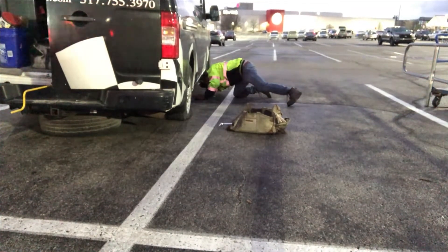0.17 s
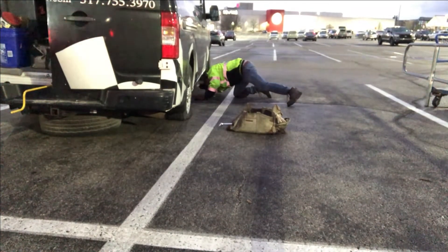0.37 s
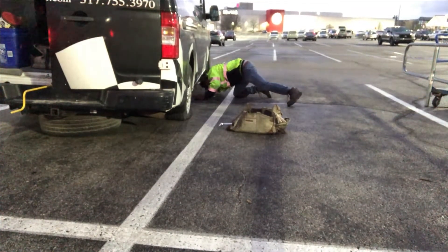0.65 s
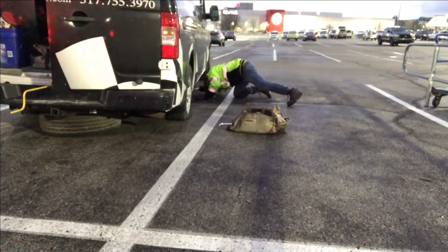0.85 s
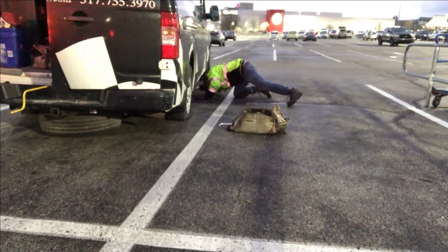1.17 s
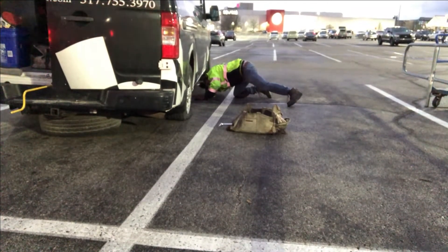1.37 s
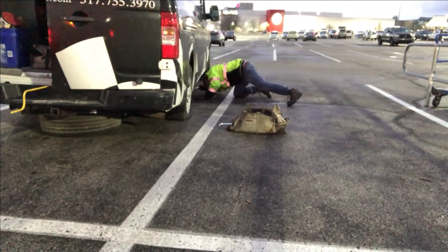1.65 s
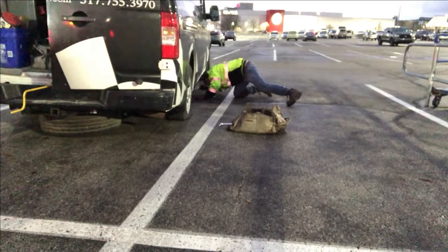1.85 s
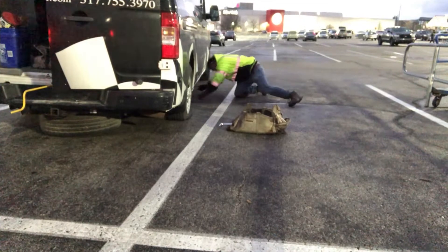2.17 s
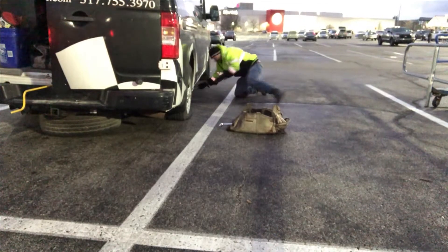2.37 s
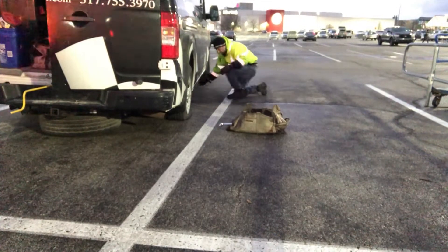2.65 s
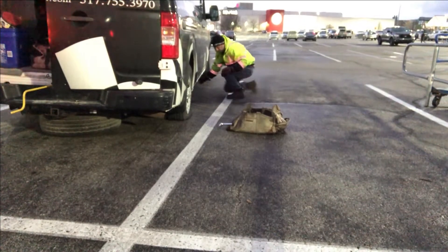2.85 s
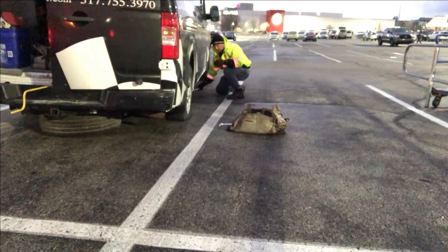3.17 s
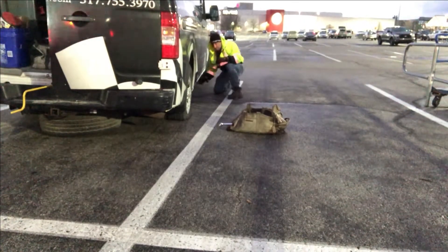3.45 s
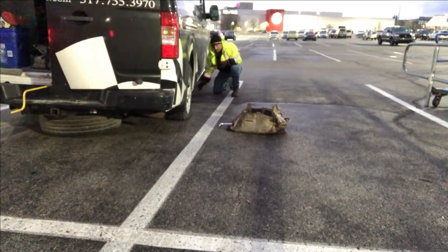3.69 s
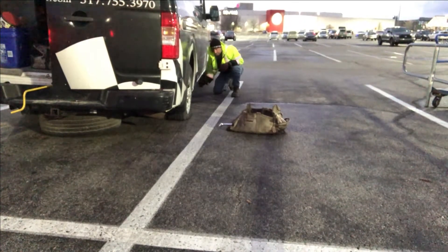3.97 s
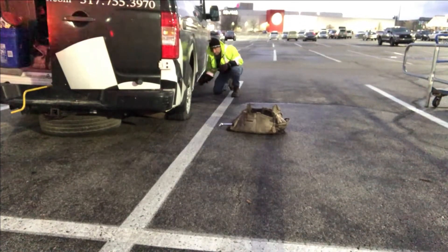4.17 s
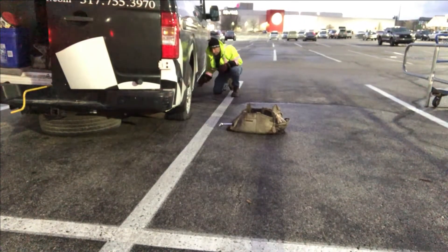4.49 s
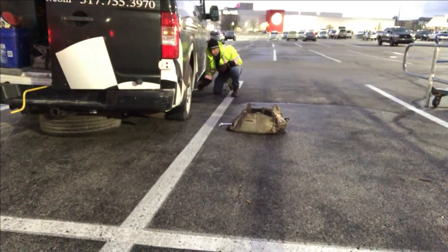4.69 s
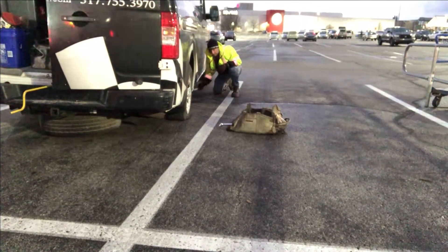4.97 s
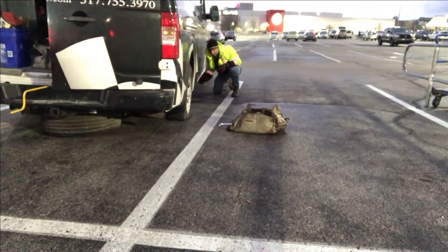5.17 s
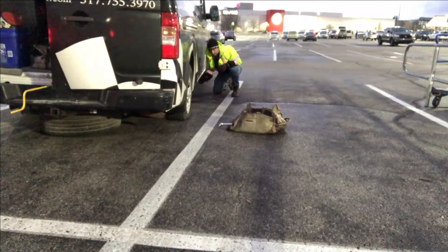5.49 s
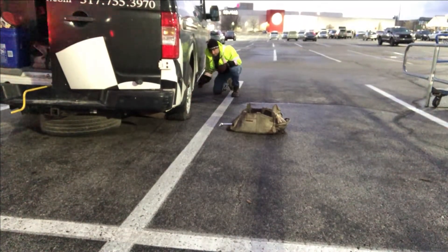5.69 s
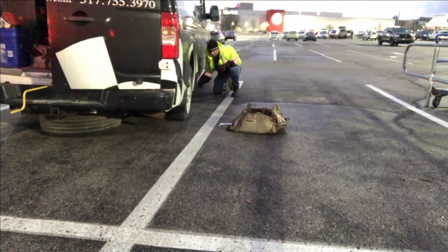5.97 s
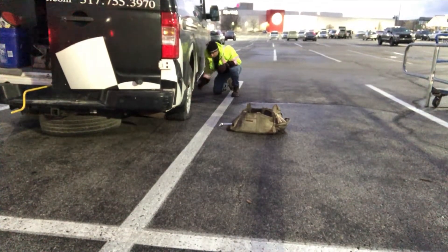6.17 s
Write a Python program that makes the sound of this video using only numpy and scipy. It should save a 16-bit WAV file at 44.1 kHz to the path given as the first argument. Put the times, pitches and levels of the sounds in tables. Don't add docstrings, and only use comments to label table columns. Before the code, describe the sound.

Outdoors in a car park, a floor jack is pumped in quick rattling strokes with metallic clinks and drops, plus one early hard knock. Boots and knees bump and scrape as the worker shifts, a stiff jacket rustling. Then heavy blows boom the van panels and ring the handle. Distant traffic hums. A close wireless microphone, left channel only, clips on knocks and stutters with tiny dropouts.

```python
import sys
import numpy as np
from scipy import signal
from scipy.fft import rfft, irfft, next_fast_len
from scipy.io import wavfile
from scipy.ndimage import map_coordinates

SR = 44100
rng = np.random.default_rng(int(sys.argv[2]) if len(sys.argv) > 2 else 0)


def inscribe(sig):
    pcm = np.round(np.clip(np.atleast_2d(sig).T, -1, 1) * 32767)
    wavfile.write(sys.argv[1], SR, pcm.astype(np.int16))


def ratio(d):
    e = np.asarray(d, float) / 20
    return 10 ** e


N = 279153

# start_s, crack_db, boom_db, ring_db, length_factor
KNOCKS = [
    (0.2572, -18.5, -13, -41.5, 1.1),
    (2.7786, -25, -20, -35, 1.27),
    (2.812, -31, -26, -61, 1.86),
    (3.4354, -44, -19.5, -73, 1.32),
    (4.2407, -19, -13, -32, 1.59),
    (4.8682, -13, -10.5, -32.5, 1.17),
    (5.181, -17.5, -10.5, -36, 1.1),
    (5.4924, -19, -11, -40, 1.13),
    (5.8003, -24.5, -16.5, -35.5, 1.38),
    (6.1, -29.5, -19.5, -53, 1.29),
]
# start_s, peak_db
DROPS = [
    (0.1378, -21.5),
    (0.5606, -19.5),
    (0.9552, -24.5),
    (1.3357, -23.5),
    (1.6826, -25),
]


def unit(x):
    return x / np.sqrt(np.mean(x ** 2) + 1e-20)


def along(points, hz):
    f, v = np.transpose(points)
    return np.interp(np.log(hz + 1), np.log(f + 1), v)


def curve(rows):
    return np.interp(np.arange(N) / SR, *np.transpose(rows))


def wobble(rate_hz):
    knots = rng.standard_normal(int(N * rate_hz / SR) + 4)
    return map_coordinates(knots, [np.arange(N) * rate_hz / SR])


def filtered(x, response):
    m = next_fast_len(N + SR // 2)
    return irfft(rfft(x, m) * response(np.fft.rfftfreq(m, 1 / SR)), m)[:N]


def hiss(spectrum):
    return unit(filtered(rng.standard_normal(N), lambda hz: ratio(along(spectrum, hz))))


def low_pass(hz, edge_hz):
    return 1 / (1 + (hz / edge_hz) ** 4)


def decay(t, t60_s):
    return ratio(-60 * t / t60_s)


def rise(t, rise_s):
    return 1 - np.exp(-t / rise_s)


def modes(t, rows):
    return sum(ratio(db) * decay(t, t60_s) * np.sin(2 * np.pi * hz * t) for hz, db, t60_s in rows)


def add(track, s, piece):
    part = track[round(s * SR):][:len(piece)]
    part += piece[:len(part)]


def lot():
    # pitch_hz, level_db_per_hz
    rumble_spectrum = [(8.8, -40.5), (15, 7.5), (81, -4), (120, -5.5), (151, -8.5), (214, -17),
                       (300, -23.5), (390, -69), (660, -120)]
    # pitch_hz, level_db_per_hz
    wash_spectrum = [(130, -21), (220, -9), (400, -11), (800, -16.5), (2070, -31.5), (5000, -48),
                     (11000, -59), (14500, -74), (16500, -110)]
    # time_s, strength_db
    breeze = [(0, -48), (0.35, -43), (0.8, -48), (1.45, -43.5), (1.9, -45.5), (2.4, -40), (3.2, -42),
              (3.6, -45.5), (4.2, -41), (4.7, -48), (5.1, -44.5), (5.8, -44), (6.33, -43)]
    # time_s, effort_db
    effort = [(0, 4.5), (0.3, -7), (0.62, -7.5), (0.88, 1), (1.1, -9), (1.7, -6.5), (2.0, 8), (2.2, -4),
              (2.45, 1.5), (2.9, 3.5), (3.3, -5), (3.5, 4.5), (3.85, -9), (4.1, -2), (4.4, -11),
              (5.0, -0.5), (5.35, -6), (6.33, -9.5)]
    traffic_db, grit_db, grit_growth = -56.5, -48.5, 1.2
    gusts_db = 1.5 * wobble(9)
    rumble = ratio(curve(breeze) + 8 + gusts_db) * hiss(rumble_spectrum)
    wash_level = ratio(traffic_db) + ratio(grit_db + grit_growth * curve(effort))
    return rumble + wash_level * ratio(1.0 * wobble(18)) * hiss(wash_spectrum)


def jacket():
    # time_s, level_db
    rustle = [(0, -70), (0.25, -98), (0.75, -67.5), (1.05, -98), (1.75, -72), (2.4, -79), (2.82, -59),
              (3.4, -74), (3.68, -63), (4.05, -70), (4.4, -87), (5.05, -64), (5.35, -78.5), (5.62, -72),
              (6.33, -89)]
    weave = hiss([(2000, -28), (3800, -2), (4700, -4.5), (6200, -14.5), (9000, -23), (12000, -48), (14000, -70)])
    creases_db = 3.8 * wobble(30) + 2.7 * wobble(300)
    return ratio(curve(rustle) + 1.0 + creases_db) * weave


def small_contacts():
    # start_s, peak_db, pitch_hz
    clink_rows = [(0.067, -20.5, 1725), (0.1465, -20, 1630), (0.455, -42, 1246), (0.5015, -22.5, 1704),
                  (0.5626, -29, 1900), (0.8535, -28.5, 1246), (0.8778, -20, 1990), (0.9578, -30, 1097),
                  (1.269, -34, 1740), (1.3353, -29, 1266), (1.6055, -26.5, 1806), (1.6846, -30, 1980),
                  (1.9244, -16.5, 2115), (2.0134, -30, 1237), (2.1722, -32, 1956), (2.4016, -28, 3190),
                  (2.4483, -36, 2070), (2.5244, -41, 1600), (2.737, -42, 2760), (3.1268, -24, 1717),
                  (3.2504, -28.5, 3030), (3.5639, -30, 1810), (3.5796, -28, 1965), (3.693, -27.5, 2770),
                  (3.7773, -33.5, 1115), (4.0846, -39, 1970), (4.132, -35, 2830), (4.288, -38, 1350),
                  (4.6668, -38, 1087)]
    # start_s, peak_db, pitch_hz, t60_s
    pings = [(0.455, -48, 4330, 0.15), (0.562, -47, 6400, .15), (1.66, -51, 5830, .3),
             (4.294, -40, 2720, .1), (4.36, -44, 2890, .15), (4.36, -46, 2000, .15),
             (2.806, -38, 1960, .15), (2.806, -42, 3150, .15), (3.27, -38, 2100, .08),
             (3.362, -42, 2000, .05), (3.374, -42, 2300, .05), (3.637, -38, 2750, .06),
             (3.615, -36, 1850, .06), (2.399, -28.5, 3890, 0.079), (2.527, -47, 4400, 0.14),
             (3.777, -42, 4350, 0.1)]
    # start_s, peak_db, pitch_hz, t60_s
    bumps = [(2.337, -30, 555, .05), (2.372, -26, 590, 0.044), (2.33, -24, 48, 0.12),
             (2.408, -20, 590, 0.03), (2.422, -22, 480, 0.03), (2.447, -37, 590, .05),
             (2.498, -29, 490, 0.08), (2.578, -21.5, 547, 0.076), (2.590, -17.5, 397, 0.12),
             (2.598, -24, 706, 0.065), (2.612, -22.5, 490, 0.1), (2.743, -28.5, 630, 0.1),
             (3.548, -18, 295, 0.11), (3.569, -25, 269, 0.033), (3.12, -31.5, 305, 0.14)]
    # start_s, peak_db, pitch_hz
    grit = [(2.338, -40, 1200), (2.357, -36, 1100), (2.358, -44, 2900), (2.371, -38, 1000),
            (2.386, -40, 1500), (2.4095, -22, 560), (2.4225, -25, 500), (2.447, -34, 2050),
            (2.474, -38, 900), (2.498, -38, 3100), (2.530, -38, 2400), (2.580, -37, 2500),
            (2.588, -36, 3100), (2.592, -24, 640), (2.605, -30, 800), (2.618, -30, 420), (2.666, -40, 2400),
            (2.730, -37, 2100), (2.742, -36, 2750), (2.752, -33, 800)]
    # start_s, peak_db, pitch_hz
    more_grit = [(1.870, -36, 1050), (1.882, -38, 950), (2.512, -46, 4500), (2.545, -44, 4300),
                 (2.556, -45, 3700), (3.1098, -34, 1940), (3.1278, -25, 1740), (3.140, -28, 2050),
                 (3.158, -30, 3000), (3.249, -32, 2500), (3.2745, -38, 3100), (3.3618, -42, 2190),
                 (3.5349, -40, 985), (3.5538, -32, 2840), (3.5623, -27, 1780), (3.6805, -40, 1960),
                 (3.6935, -32, 2760), (3.7324, -41, 1170), (3.7783, -34, 1100)]
    # start_s, peak_db, pitch_hz
    ticks = [(0.399, -30, 1500), (0.445, -55, 9500), (0.7465, -43.5, 6450), (1.2045, -52, 6160),
             (2.066, -15.5, 1220), (2.357, -48.5, 2350), (2.277, -45, 2190), (2.971, -26, 800),
             (2.6585, -33, 800), (4.3483, -28, 800), (5.0478, -39, 5060), (5.2536, -29.5, 5060),
             (5.7935, -24.5, 4600), (0.806, -42, 1400), (1.188, -44, 1500), (1.9195, -24, 2100),
             (4.031, -38, 1500), (6.178, -40, 1600)]
    out, t = np.zeros(N), np.arange(SR // 4) / SR

    clink_t60_s = 0.1
    clinks = [(*row, clink_t60_s) for row in clink_rows]
    piston_db, piston_hz, piston_t60_s = -2.5, 618, 0.1
    piston = [(s + .002, db + piston_db, piston_hz, piston_t60_s) for s, db in DROPS]
    for rows, rise_s, wander_rad in [(clinks + pings, .004, 1.2), (bumps + piston, .003, .8)]:
        for s, db, hz, t60_s in rows:
            drift = wander_rad * np.interp(t, np.linspace(0, t[-1], num=40), rng.standard_normal(size=40))
            tone = np.sin(2 * np.pi * hz * t + drift)
            add(out, s, ratio(db - 1.0) * decay(t, t60_s) * rise(t, rise_s) * tone)

    grit_db, grit_cycles = -3, 14
    for s, db, hz in grit + more_grit:
        add(out, s, modes(t, [(hz, db + grit_db, grit_cycles / hz)]))

    touch_db, touch_hz = 1.5, 680
    touches = [(row[0], row[1] + touch_db, touch_hz) for row in KNOCKS]
    for s, db, hz in ticks + touches:
        attack = np.clip(1.9 * hz * t, 0, 1)
        add(out, s, -attack * modes(t, [(hz, db + 11.5, 3.7 / hz)]))
    return out


def bursts():
    # start_s, peak_db, low_share_db, t60_s
    jolts = [(2.158, -40, -1.5, 0.2), (2.171, -38, -3, 0.15), (2.3993, -27, 2.5, 0.18),
             (2.576, -36, 9, 0.25), (2.709, -39, -2, 0.2), (2.7192, -32, -2, 0.11), (2.806, -33, -7, 0.25),
             (3.1248, -21, -23, 0.18), (3.2464, -30.5, -10, 0.14), (3.36, -45.5, -6, 0.17),
             (3.548, -33, -4, 0.17), (3.5606, -29, -4, 0.17), (3.68, -33, -15, 0.25),
             (3.7758, -33, -2.5, 0.14), (4.082, -32, -9, 0.089), (4.1305, -38, -2, 0.081),
             (4.294, -41, 0.5, 0.1), (4.356, -42, 1.5, 0.2), (4.664, -41, 1.5, 0.17),
             (5.293, -38.5, -3, 0.058), (5.895, -36, 1, 0.086), (6.1765, -32, 4.5, 0.1)]
    # start_s, peak_db, high_share_db
    drags = [(0.012, -39, -27), (1.219, -36, -31), (1.5474, -36.5, -42), (1.8676, -40, -38),
             (2.4483, -40, -17), (2.6444, -42.5, -14.5), (3.076, -40.5, -41), (3.528, -33, -21),
             (3.585, -34, -19), (4.029, -35, -27)]
    # start_s, peak_db
    slacks = [(0.0308, -26.5), (0.444, -31.5), (0.841, -30), (1.231, -30.5), (1.5824, -30), (1.8946, -30)]
    # start_s, peak_db
    pulls = [(0.053, -25.5), (0.4873, -26.5), (0.876, -26), (1.255, -27.5), (1.6024, -21), (1.9185, -21)]
    # start_s, peak_db
    stops = [
        (1.186, -41),
        (2.0108, -22),
    ]
    # start_s, peak_db
    thuds = [(0.3955, -39), (0.805, -47), (2.354, -43), (3.7334, -46.5), (4.2044, -61), (5.5867, -41.5)]
    # start_s, peak_db
    swishes = [(2.2744, -71), (2.495, -50), (2.527, -50), (2.587, -50), (3.2745, -64), (4.2044, -59),
               (4.5344, -60), (4.953, -55), (6.0314, -58), (6.06, -58)]
    jolt_high_db, jolt_rise_s = -21, 0.003
    drag_low_db, drag_rise_s, drag_t60_s = 0, .016, 0.37
    rows = [(s, db, low_db, jolt_high_db, jolt_rise_s, t60_s) for s, db, low_db, t60_s in jolts]
    rows += [(s, db, drag_low_db, high_db, drag_rise_s, drag_t60_s) for s, db, high_db in drags]
    # (low_share_db, high_share_db, rise_s, t60_s)
    kinds = [(slacks, (-6.5, -27.5, .007, 0.3364)),
             (pulls, (-4, -20, .003, .24)),
             (DROPS, (-4, -17.5, .002, 0.145)),
             (stops, (-15, -27, .005, .13)),
             (thuds, (10, -42.5, .005, .12)),
             (swishes, (-4, -7.5, .004, .13))]
    return rows + [(s, db, *kind) for events, kind in kinds for s, db in events]


def strokes():
    # pitch_hz, level_db_per_hz
    rasp = [(150, -22.5), (250, 0), (430, -12), (600, -4), (866, -4), (1600, -7.5), (2800, -8.5),
            (7000, -26.5), (11400, -34.5), (15500, -46), (17000, -86)]
    # pitch_hz, width_hz, boost_db
    frame = [(608, 40, 9), (1230, 30, 8), (1720, 30, 11), (1990, 35, 9), (2110, 25, 7), (2780, 35, 9),
             (3100, 35, 10), (3850, 50, 6), (4400, 60, 8), (5130, 50, 5), (5810, 45, 10), (6420, 45, 9),
             (7800, 70, 7)]
    low, mid, high, top = np.zeros((4, N))
    t = np.arange(SR // 2) / SR
    echo = ratio(-32.5) * decay(t, 0.55)
    for s, db, low_db, high_db, rise_s, t60_s in bursts():
        swell = rise(t, np.clip(rise_s, .0005, .05))
        add(low, s, ratio(db + low_db - 2.5) * decay(t, t60_s * 1.03) * swell)
        add(mid, s, ratio(db - 4.5) * (decay(t, t60_s) + echo) * swell)
        add(high, s, ratio(db + high_db + 8.5) * (decay(t, t60_s * 0.91) + echo) * swell)
        add(top, s, ratio(db + 1.77 * high_db + 15) * decay(t, t60_s * 0.77) * swell)

    def frame_gain(hz):
        return 1 + sum((ratio(db) - 1) / (1 + ((hz - c) / width) ** 2) for c, width, db in frame)

    def band(hz, from_hz, to_hz):
        colour = ratio(along(rasp, hz)) * frame_gain(hz)
        return colour * low_pass(hz, to_hz) * (1 - low_pass(hz, from_hz))

    out = np.zeros(N)
    edges_hz = [(30, 1000), (950, 3680), (3700, 4960), (7500, 9300)]
    for level, (from_hz, to_hz) in zip([low, mid, high, top], edges_hz):
        chatter = rng.standard_normal(N) * ratio(3 * wobble(600) + .7 * wobble(90))
        out += level * unit(filtered(chatter, lambda hz: band(hz, from_hz, to_hz)))
    return out


def knocks():
    # pitch_hz, level_db, t60_s
    body = [(124.5, -15, 0.19), (162.7, 3, 0.091), (209, -8, 0.066), (238, -12, 0.08), (286, -7, 0.08),
            (306.6, -5.5, 0.063), (336.6, -10.5, 0.1), (412.7, -10.5, 0.086), (650.5, -19.5, 0.063),
            (845, -27.5, 0.17), (942, -28, 0.15), (1090, -30.5, 0.084), (1530, -37, 0.079)]
    # pitch_hz, level_db, t60_s
    bar = [(4840, -6, 0.24), (5130, -8, 0.15), (5400, -8, 0.2), (5730, -20, .15), (6290, -6, 0.09)]
    grips = [(-6, -9, 6, 2), (-3, -4, -10, -20), (0, 0, 0, -10), (0, 0, 0, -10), (2, -14, -5, 1),
             (0, -12, -5, 0), (0, -14, -5, 2), (0, -12, -5, 0), (0, -14, -5, -2), (0, -12, -5, -2)]
    # pitch_hz, level_db, t60_s
    saddle = [(1254, -6, .13), (1320, -8, .15), (1415, -2, .08), (1580, -2, .08), (1850, -14, .15),
              (2085, -14, .16), (2550, -17, .15), (2730, -17, .15), (2893, -17, .18), (3040, -15, .12),
              (3160, -19, .17), (3450, -24, .2), (3780, -26, .15), (4120, -26, .12)]
    # pitch_hz, level_db_per_hz
    crack_spectrum = [(120, -45), (200, 3), (647, -13), (933, -14), (3130, -34), (4270, -47.5),
                      (4950, -38.5), (5420, -43.5), (16000, -72)]
    saddle_db = -10
    soft_loss, soft_hz = .35, 600
    out, dull, sharp, snap = np.zeros((4, N))
    t = np.arange(SR // 2) / SR
    spread = rise(t, 0.0018)
    landing = 1 / (1 + (t / .095) ** 14)
    for (s, crack_db, boom_db, ring_db, length), grip in zip(KNOCKS, grips):
        detune = rng.normal(1, .001)
        soft_db = soft_loss * min(crack_db - boom_db + 9, 0)
        boom = modes(t, [(hz, db + soft_db * (hz > soft_hz) + rng.normal(0, 1.6) * (db < 0), t60_s * length)
                         for hz, db, t60_s in body])
        ring = modes(t, [(hz * detune, db + change_db, t60_s)
                         for (hz, db, t60_s), change_db in zip(bar, (0, *grip))])
        arm = modes(t, [(hz * rng.normal(1, .004), db + rng.normal(0, 3), t60_s * length)
                        for hz, db, t60_s in saddle])
        add(out, s, ratio(crack_db + saddle_db) * arm)
        add(out, s, -ratio(boom_db + 11) * spread * boom)
        add(out, s, ratio(ring_db) * rise(t, 0.0028) * landing * ring)

        dull_tail = decay(t, 0.19 * length) + ratio(-17) * decay(t, 0.43)
        add(dull, s, ratio(boom_db - 5 + soft_db / 2) * spread * dull_tail)
        sharp_tail = decay(t, 0.055 * length) + ratio(-16) * decay(t, 0.26)
        add(sharp, s, ratio(crack_db + 1.1) * rise(t, 0.00024) * sharp_tail)
        add(snap, s, ratio(1.5 * crack_db + 3.5) * decay(t, 0.027))

    crack = hiss(crack_spectrum)
    below = unit(filtered(crack, lambda hz: low_pass(hz, 830)))
    above = unit(filtered(crack, lambda hz: low_pass(hz, 6700) * (1 - low_pass(hz, 570))))
    steel = hiss([(400, -15.0), (1200, -0.5), (4500, -9.5), (9000, -21.5), (16000, -38.0)])
    return out + dull * below + sharp * above + snap * steel


def scene():
    heard = lot() + jacket() + small_contacts() + strokes() + knocks()
    return np.array([heard, np.zeros(N)])


def gaps():
    # start_s, lost_packets
    long_gaps = [(2.1911, 3), (2.5662, 3), (2.959, 4), (2.9815, 11), (3.0541, 4), (3.0839, 5), (3.1015, 3),
                 (3.2591, 4), (3.4003, 6), (3.4209, 5), (3.744, 4), (3.8641, 4), (3.9092, 6), (4.0013, 3),
                 (4.2311, 3), (4.9337, 6), (4.9791, 4), (5.0012, 3), (5.284, 4), (5.3664, 5), (5.6029, 4.5),
                 (5.6962, 5), (5.7441, 4), (6.1836, 4)]
    short_gaps = [2.1217, 2.2863, 2.6288, 2.9715, 3.0239, 3.1181, 3.1639, 3.304, 3.3538, 3.5113, 3.6739,
                  3.769, 3.9589, 4.0239, 4.0764, 4.4015, 4.4638, 4.5588, 4.8888, 4.9631, 5.1638, 5.3038,
                  5.3537, 5.7237, 5.7637, 5.9287, 6.0239, 6.1637]
    # start_s, gap_count, spacing_packets
    stutters = [(2.4764, 2, 4), (2.659, 2, 10), (2.9213, 2, 5), (3.7139, 2, 4), (4.3288, 2, 8),
                (4.639, 3, 4), (4.7214, 2, 9), (4.7938, 2, 10), (5.0232, 2, 10), (5.0688, 2, 10),
                (5.114, 2, 4), (5.1391, 2, 4), (5.2137, 4, 8), (5.4089, 2, 6), (5.4441, 2, 8),
                (5.5138, 2, 8), (5.5584, 2, 8), (5.6489, 2, 4), (5.7938, 2, 8), (5.8588, 2, 10)]
    packet_ms, resync_ms = 2.5, 1.75
    repeats = [s + k * apart * packet_ms / 1000 for s, count, apart in stutters for k in range(count)]
    losses = long_gaps + [(s, 2) for s in short_gaps + repeats]
    return [(s, packets * packet_ms + resync_ms) for s, packets in losses]


def band_limit(x):
    return signal.sosfilt(signal.butter(12, 16590, fs=SR, output="sos"), x)


def record(dry):
    limit = np.where(dry[0] > 0, .97, .72)
    clipped = dry[0] / (1 + np.abs(dry[0] / limit) ** 12) ** (1 / 12)
    link, ramp = np.ones(N), np.linspace(0, 1, num=26) ** 2.5
    for s, ms in gaps():
        a, b = round(s * SR), round((s + ms / 1000 + .0003) * SR)
        link[a:b] = .8 * np.exp(-np.arange(b - a) / SR / .00022)
        link[b - len(ramp):b] = ramp
    left = filtered(clipped * link, lambda hz: 1j * hz / (7 + 1j * hz))
    return band_limit(np.array([left, dry[1]]))


dry = scene()
out = record(dry)
inscribe(out)
```